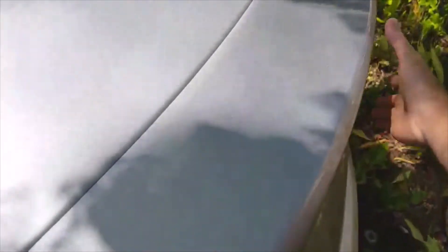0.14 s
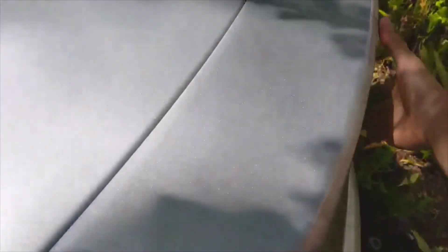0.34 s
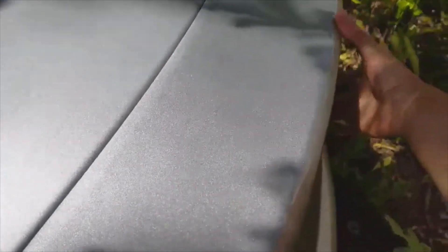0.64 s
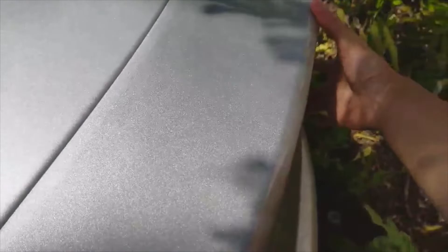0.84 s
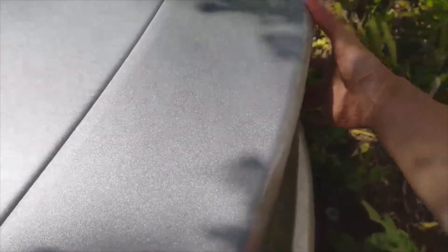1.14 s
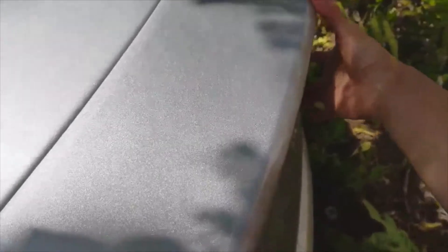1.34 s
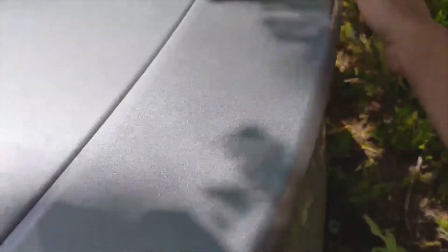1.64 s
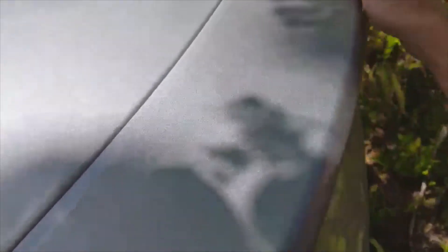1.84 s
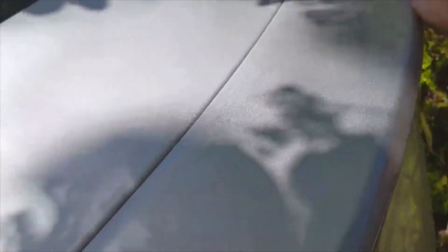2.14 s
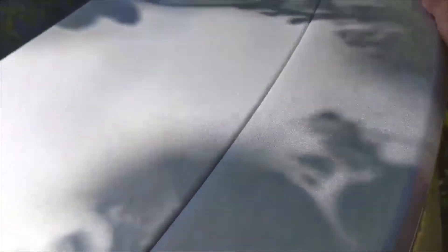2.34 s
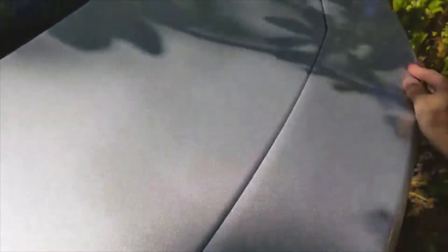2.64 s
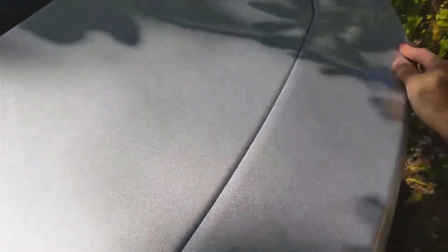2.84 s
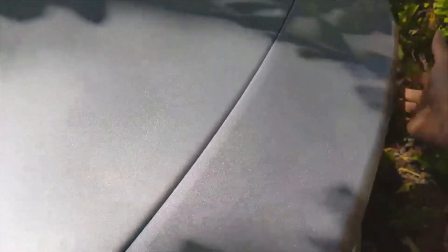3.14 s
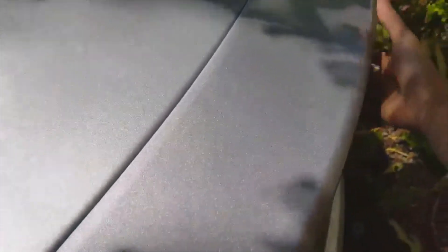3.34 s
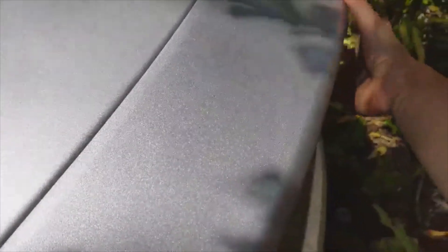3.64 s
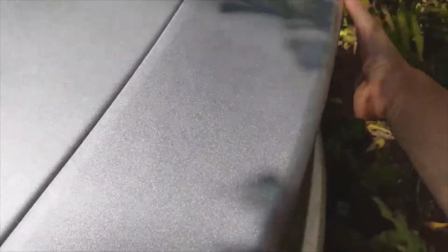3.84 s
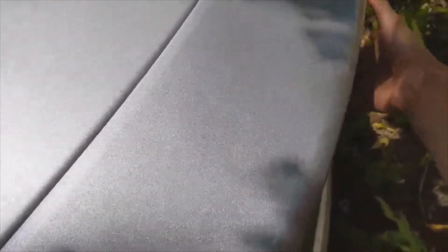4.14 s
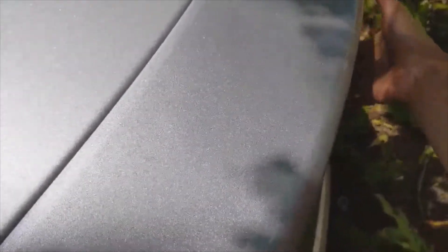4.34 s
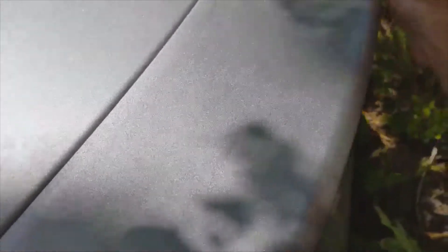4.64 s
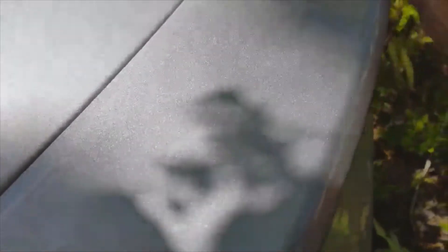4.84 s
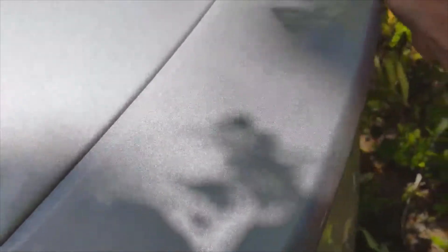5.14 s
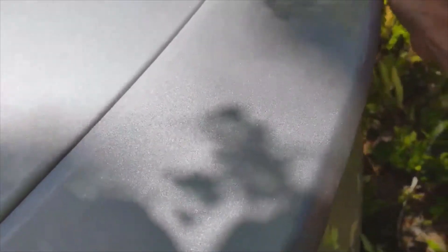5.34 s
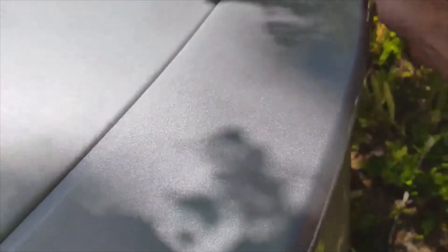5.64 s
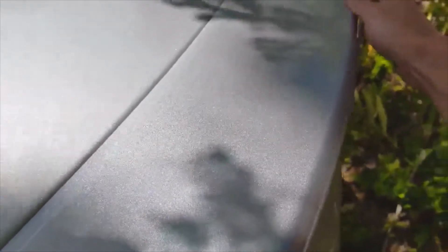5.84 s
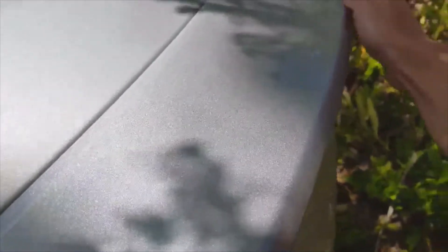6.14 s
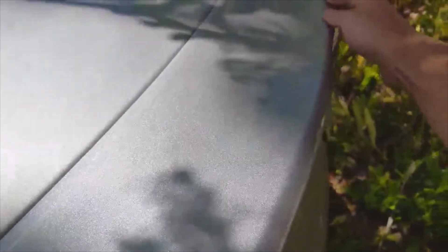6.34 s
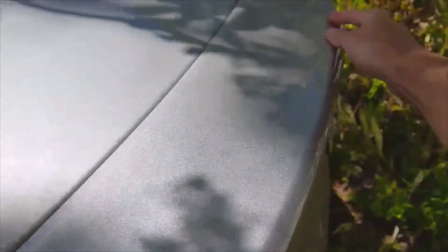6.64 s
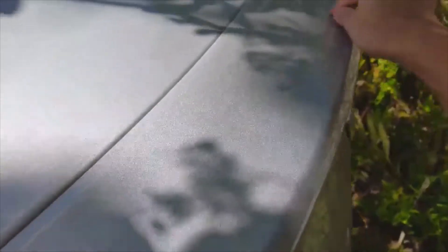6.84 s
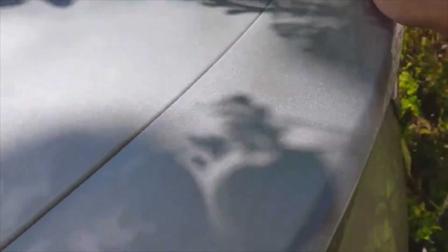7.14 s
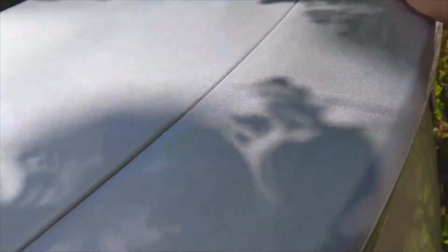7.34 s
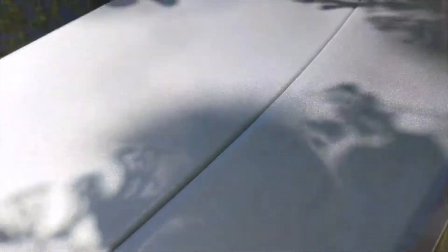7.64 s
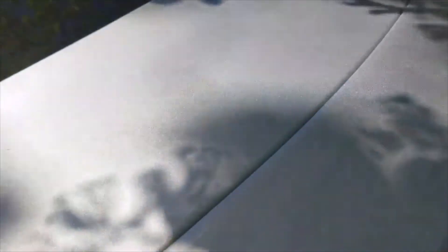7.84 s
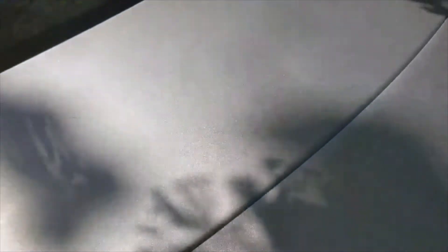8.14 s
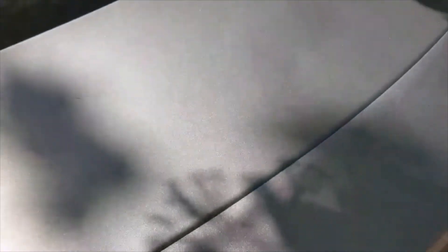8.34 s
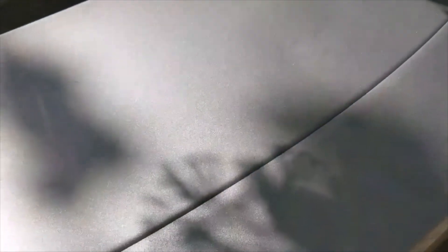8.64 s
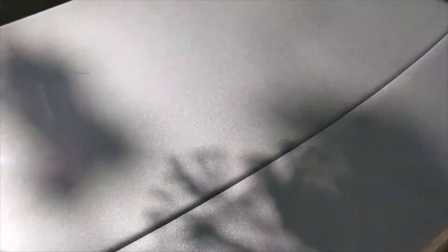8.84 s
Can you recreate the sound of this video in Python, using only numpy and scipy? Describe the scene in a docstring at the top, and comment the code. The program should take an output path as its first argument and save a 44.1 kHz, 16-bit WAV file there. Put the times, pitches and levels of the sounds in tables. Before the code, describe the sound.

Two close car door slams, each after a quieter clunk of the handle, over faint leaves and a distant bird.

```python
"""A car door is pulled open and swung shut twice, close by, in a leafy yard.
Opening, the handle clunks and the latch springs free; shutting, the latch ticks, the door hits its
seal, the sheet metal rings and the cabin air booms. Each hit is a noise rattle plus ringing modes.
Around it are small grainy rubs and ticks of a nearby hand, the sine whistles of a far bird,
and a soft murmur of leaves and distant traffic."""
import sys
import numpy as np
from scipy import signal
from scipy.io import wavfile
from scipy.ndimage import uniform_filter1d

SR = 44100
rng = np.random.default_rng(int(sys.argv[2]) if len(sys.argv) > 2 else 0)


def bounce(signal):
    """Save signal as a 16-bit WAV file at the path given by the first command-line argument."""
    frames = np.transpose(np.atleast_2d(signal))
    limited = np.clip(frames, -1, 1)
    pcm = np.round(limited * 32767).astype(np.int16)
    wavfile.write(sys.argv[1], SR, pcm)


N = 397341
T = np.arange(N) / SR

# Pulls of the handle, timed where the lock hits its stop: time_s, level_db
OPENINGS = [(1.239, -25), (4.169, -25)]
# Shutting swings, timed where the door meets its frame: time_s, speed_m_per_s
SHUTS = [(2.613, 1.0), (8.2835, .745)]
# Stereo image of the outdoor murmur and the rubs: frequency_hz, correlation
AIR_CORRELATION = [(60, 0.75), (250, 0.72), (600, 0.17), (1200, 0), (4000, 0.043), (12000, 0.05)]


def door():
    """The whole door: handle, latch and slam over soft low bumps and the cabin's boom."""
    # Stereo image of the rattle: frequency_hz, correlation
    correlation = [(100, 0.89), (280, 1), (600, 0.95), (1200, 0.11), (4000, 0.29), (12000, -0.46)]
    bands = []
    for band in noise_bands(thirds(100), correlation):
        power = uniform_filter1d(np.mean(band ** 2, axis=0), int(.02 * SR))
        bands.append(band / np.sqrt(power + 1e-9))   # steady noise, so the hits alone shape it
    lock = pan(handle(bands) + latch(bands), left_db=-.2)
    body = pan(slam(bands), left_db=-1.5) + low_bumps()
    return lock + body + pan(cabin_boom(leak_hz=24.2, ring_db=4), left_db=1.5)


def handle(bands):
    """Handle and lock clunk on each pull, and again as the shut door rebounds from its seal."""
    # Slack taken up, lock caught, stop hit: delay_s, level_db, tilt_db_per_octave, build_s, ring_factor
    pull = [(-.062, -22.5, 3.6, .008, 4.2), (-.0215, -11.7, 2.8, .0018, 1.1), (0, -.3, 0, .002, .8)]
    # Rebound on the lock: delay_s (at 1 m/s), level_db, tilt_db_per_octave, build_s, ring_factor
    rebound = [(.0195, -25, -2.5, .003, 1.25)]
    # Colour of the lock's rattle: frequency_hz, density_db
    colour = [(65, -34), (110, 2.5), (455, -5.5), (547, 2), (792, -13.5), (1010, -10.5), (1630, -16),
              (2360, -19.5), (10800, -50.5), (13800, -49), (15000, -78)]
    # Modes of the handle and the skin around it: pitch_hz, level_db, t60_s
    modes = [(155, 2, 0.098), (274, -5.5, 0.17), (330, -5, .1), (398, -16, .08), (535, 1, .08),
             (600, -7.5, 0.18), (1015, 1, 0.065), (1286, -10, 0.059), (1420, -8.5, .07), (2040, -18, 0.097)]
    hits = on_opening(pull)
    hits += [(s + delay * speed, *touch) for s, speed in SHUTS for delay, *touch in rebound]
    clatter = rattle(hits, colour, bands, crack_db=.5, crack_s=.0076,
                     tail_db=-38, tail_t60=.6, lag_cycles=.42, low_cut_hz=260)
    return clatter + struck(hits, modes, level_db=4, swell_cycles=3.15, scatter_db=1.2)


def latch(bands):
    """The latch springs free on opening and ticks on shutting; soft door knocks ring the same modes."""
    # The latch drags, then lets go: delay_s, level_db, tilt_db_per_octave, build_s, ring_factor
    release = [(.0445, -18, 2, .021, .8), (.065, -1.2, .3, .0036, .9)]
    # Tick on the striker: gap_m, level_db, tilt_db_per_octave, build_s, ring_factor
    striker = [(.0293, -33, 1.6, .0005, 1.0)]
    # A hand takes hold, then the hinge stay knocks: time_s, level_db, tilt_db_per_octave, build_s
    soft_knocks = [(.333, -52, -5, .004), (1.595, -46, -1, .023), (4.503, -46, -.5, .007),
                   (4.587, -47.5, 1, .001), (5.675, -49, -1, .03), (6.7, -49, -2, .03),
                   (7.873, -41.5, -2, .0034), (7.925, -44.5, -4, .017)]
    # Colour of the latch's rattle: frequency_hz, density_db
    colour = [(65, -45), (110, 1), (245, -2.5), (645, -18), (953, -8), (1300, -14), (2610, -21.5),
              (3560, -28), (12000, -44), (14100, -47), (15000, -82)]
    # Modes of the latch and the freed door: pitch_hz, level_db, t60_s
    modes = [(191, 1, 0.107), (246, 6, 0.13), (269, -1, 0.27), (306.4, -2.5, 0.3), (380, -4.5, 0.19),
             (409, -11, 0.12), (592, -3.5, 0.11), (770, -22, 0.16), (960, -13.5, 0.16), (1064, -21, .11),
             (1780, -17, 0.18), (2370, -5, .08), (2540, -7, 0.063), (5790, -15, 0.06)]
    knock_ring_factor = 1.4
    hits = on_opening(release) + on_shutting(striker)
    hits += [(*knock, knock_ring_factor) for knock in soft_knocks]
    clatter = rattle(hits, colour, bands, crack_db=5.5, crack_s=.0061,
                     tail_db=-38, tail_t60=.6, lag_cycles=.54, low_cut_hz=200)
    return clatter + struck(hits, modes, level_db=-1, swell_cycles=1.7, scatter_db=.1)


def slam(bands):
    """The door lands and its sheet metal rings."""
    # Hits on the seal, then the frame: gap_m, level_db, tilt_db_per_octave, build_s, ring_factor
    seating = [(.006, -18, .6, .002, .6), (0, -14.7, 1.3, .0007, .76)]
    # Colour of the slam's rattle: frequency_hz, density_db
    colour = [(53, -31), (90, 7.5), (144, 0), (231, -6), (318, -10), (354, -6.5), (543, -10), (592, -6),
              (765, -17), (1390, -17), (1840, -25.5), (3280, -27.5), (12100, -49.5), (14100, -47),
              (15000, -66)]
    # Sheet-metal modes of the shut door: pitch_hz, level_db, t60_s
    modes = [(98.2, -5, 0.35), (116.8, -2.5, .32), (134.3, -1, .28), (152.6, -2.5, 0.28), (196, 4, 0.042),
             (262, -8, .3), (316, -4, 0.27), (383, -15, .2), (436, -1, 0.22), (496, -2, 0.2),
             (580, 1, 0.18), (667, -17, 0.17), (757, -3, 0.17), (895, 3.5, 0.11), (1026, -7.5, .12),
             (1219, -1, 0.1), (1396, 1, 0.11), (1580, -6, 0.086), (2124, -8.5, 0.1), (3315, -23, 0.082)]
    hits = on_shutting(seating)
    clatter = rattle(hits, colour, bands, crack_db=6.5, crack_s=.0037,
                     tail_db=-25, tail_t60=.65, lag_cycles=.33, low_cut_hz=116)
    return clatter + struck(hits, modes, level_db=-6.5, swell_cycles=1.15, scatter_db=.8)


def cabin_boom(leak_hz, ring_db):
    """Opening or shutting, the door pushes a pulse of air that leaks away and leaves the cabin ringing."""
    # Modes of the cabin air and the body on its springs: pitch_hz, level_db, t60_s
    modes = [(22.6, -13, 0.34), (32, -19, 0.45), (39.7, -16, 0.34), (65, -22, .36), (101, -20, .26)]
    unseal_lead_s, unseal_db, unseal_width_s = .0068, -1.2, .0023
    shut_db, shut_width_s = -4.8, .0033   # at 1 m/s; a slower door pushes softer and longer
    pulses = [(s - unseal_lead_s, db + unseal_db, unseal_width_s) for s, db in OPENINGS]
    pulses += [(s, shut_db + speed_db(speed), shut_width_s / speed) for s, speed in SHUTS]
    push = sum(from_db(db) * np.exp(-((T - s) / width) ** 2 / 2) for s, db, width in pulses)
    flow = np.gradient(push)
    boom = sum(from_db(db + ring_db) * ring(flow, hz, t60) for hz, db, t60 in modes)
    return butter(push, leak_hz, "high", order=3) + boom


def low_bumps():
    """Soft swells of low rumble."""
    # Bumps: time_s, level_db, half_length_s
    bumps = [(.3, -51, 0.082), (2.853, -46, 0.031), (3.214, -51, 0.047), (4.975, -44.5, 0.057),
             (7.914, -43, 0.051)]
    swells = sum(from_db(db) * np.exp(-((T - s) / half) ** 2) for s, db, half in bumps)
    return swells * rms_one(butter(rng.standard_normal(N), [25, 95], "band"))


def on_opening(steps):
    """The same run of hits goes with each pull of the handle."""
    return [(s + delay, pull_db + db, *touch) for s, pull_db in OPENINGS for delay, db, *touch in steps]


def on_shutting(steps):
    """The closing door hits each part when that part's gap is left to travel."""
    return [(s - gap / speed, db + speed_db(speed), *touch)
            for s, speed in SHUTS for gap, db, *touch in steps]


def speed_db(speed):
    """A faster door hits harder: 10 dB for each doubling of speed."""
    return 10 * np.log2(speed)


def rattle(hits, colour, bands, crack_db, crack_s, tail_db, tail_t60, lag_cycles, low_cut_hz):
    """Countless close modes of door and lock: a crack, a decay by band, a faint return from the trees."""
    # Decay of the rattle: frequency_hz, t60_s
    decay = [(100, 0.36), (300, 0.3), (600, 0.19), (1200, 0.18), (4000, 0.18), (12000, 0.21)]
    centres = thirds(100)[:, None]
    t60s = at_hz(decay, centres)
    share = from_db(at_hz(colour, centres)) ** 2 * centres / t60s
    power = np.zeros((len(centres), N))
    for s, db, tilt_db, build_s, ring_factor in hits:
        span = slice(int((s - .09) * SR), int((s + .45) * SR))
        t = T[span] - s - lag_cycles / centres   # long bending waves arrive later
        after = np.maximum(t, 0)
        rise = np.exp(2 * np.minimum(t, 0) / (build_s + 1 / (2 * centres)))
        fall = np.exp(-2 * np.log(1000) * after / (t60s * ring_factor))
        crack = from_db(crack_db) ** 2 * centres / (centres + 1500) * np.exp(-2 * after / crack_s)
        tail = from_db(tail_db) ** 2 * np.exp(-2 * np.log(1000) * after / tail_t60)
        tilted = share * from_db(tilt_db * np.log2(centres)) ** 2
        power[:, span] += from_db(db) ** 2 * tilted / tilted.sum() * rise * (fall + crack + tail)
    clatter = sum(np.sqrt(p) * band for p, band in zip(power, bands))
    return butter(clatter, low_cut_hz, "high", order=1)   # leave the bass to a few modes


def struck(hits, modes, level_db, swell_cycles, scatter_db):
    """Every hit sets the modes ringing; they swell over a few cycles, and high ones spread wide."""
    hz, mode_db, t60 = np.array(modes).T[:, :, None]
    t = T[:SR // 2]
    swell = 1 - np.exp(-(t * hz / swell_cycles) ** 2)
    left_lead = np.clip(hz / 900, 0, 1) * np.pi / 4 * (-1) ** np.arange(len(hz))[:, None]
    tones = np.array([np.sin(2 * np.pi * hz * t + side * left_lead) for side in (1, -1)])
    rings = tones * swell * np.exp(-np.log(1000) * t / t60)
    out = np.zeros((2, N))
    for s, db, tilt_db, _, _ in hits:
        scatter = scatter_db * rng.standard_normal(hz.shape)
        strength = from_db(db + level_db + mode_db + tilt_db * np.log2(hz / 600) + scatter)
        start = int(s * SR)
        out[:, start:start + len(t)] += (strength * rings).sum(axis=1)
    return out


def hand():
    """A finger rubs to and fro: light strokes out and, mid-run, firm strokes back that end in a snap."""
    # Single dry rubs: end_s, length_s, level_db
    lone = [(.855, .16, -59), (1.55, .093, -60), (2.053, .14, -56.5), (3.04, .035, -52), (4.85, .16, -62),
            (5.405, .04, -55.5), (7.85, .3, -61), (8.24, .07, -57)]
    period_s, snap_delay_s, snap_db = .3545, .0105, -37.5
    light = [(5.286 + k * period_s, .072, -57.5) for k in range(6)]   # same columns
    firm = [(5.783 + k * period_s, .029, -48) for k in range(3)]
    snaps = [(end + snap_delay_s, snap_db) for end, _, _ in firm]
    return rubs(lone + light + firm, grain_db=3.2) + grip_ticks(snaps, decay_s=.0019, trim_db=-.3)


def rubs(strokes, grain_db):
    """Each rub is a grainy hiss that swells and stops."""
    # Colour of the rasp: frequency_hz, density_db
    colour = [(1200, 6), (3000, -1), (4400, 13), (6000, -2), (8000, 8), (10000, -17), (12500, 1),
              (15000, -45)]
    hiss = coloured_noise(thirds(1250), colour, AIR_CORRELATION, patchy_db=1)
    envelope = np.zeros(N)
    for end, length, db in strokes:
        corners_s = [end - 1.6 * length, end - length / 2, end - length / 10, end + .015]
        envelope += from_db(db) * np.interp(T, corners_s, [0, 1, 1, 0])
    roughness = rms_one(butter(rng.standard_normal(N), 250, "low"))
    return hiss * envelope * rms_one(from_db(grain_db * roughness))


def grip_ticks(snaps, decay_s, trim_db):
    """Ticks of the grip and snaps of the finger: tiny bursts of bright noise."""
    # Ticks of the grip: time_s, level_db
    ticks = [(7.1392, -46), (7.4914, -36), (7.5557, -40), (7.6181, -41), (7.6984, -41), (7.7473, -41),
             (7.8416, -40), (7.9872, -39), (8.0661, -44), (8.1653, -46)]
    clicks = np.zeros(N)
    for s, db in ticks + snaps:
        clicks[int(s * SR)] = from_db(db + trim_db)
    envelope = signal.lfilter([1], [1, -np.exp(-1 / (decay_s * SR))], clicks + 1e-18)
    return envelope * bright_hiss(low_hz=3500, high_hz=6200)


def bird(half_note_s, waver):
    """Far whistles that arch up to their top pitch and droop, blurred by the leaves."""
    # Single calls: time_s, top_pitch_hz, level_db
    calls = [(.418, 3680, -57), (3.93, 1940, -61), (5.57, 1910, -53)]
    slide, droop = .1, .035   # shares of the pitch
    out = np.zeros((2, N))
    for s, hz, db in song(count=8) + calls:
        span = slice(int((s - .1) * SR), int((s + .1) * SR))
        t = (T[span] - s) / half_note_s
        blur = rms_one(butter(rng.standard_normal((2, len(t))), 177, "low"))
        pitch = hz * (1 - slide * np.minimum(t, 0) ** 2 - droop * np.maximum(t, 0) ** 2 + waver * blur)
        out[:, span] += from_db(db) * np.exp(-t ** 2) * np.sin(2 * np.pi * np.cumsum(pitch, axis=1) / SR)
    return out


def song(count):
    """The bird's run of notes slows, sinks in pitch and is loudest in the middle."""
    note = np.arange(count)
    time_s = 3.86 + .221 * note + .0022 * note ** 2
    pitch_hz = 3330 - 42 * note + 60 * rng.standard_normal(count)
    level_db = -55.5 - 3.5 * np.linspace(-1, 1, count) ** 2
    return list(zip(time_s, pitch_hz, level_db))


def outdoors(murmur_db, drone_hz, drone_db):
    """A softly wavering murmur of leaves and distant traffic, with a faint low drone."""
    # Colour of the murmur: frequency_hz, density_db
    colour = [(12, -33), (20, -1.5), (147, -16.5), (223, 1), (263, -13.5), (347, -4.5), (387, -9.5),
              (457, -6.5), (497, -9.5), (1460, -21), (4200, -26.5), (6180, -30), (7720, -32.5),
              (13800, -38), (15000, -49)]
    murmur = coloured_noise(thirds(20.49), colour, AIR_CORRELATION, patchy_db=1.02)
    drone = rms_one(ring(rng.standard_normal(N), drone_hz, t60=.075))
    return from_db(murmur_db) * murmur + from_db(drone_db) * drone


def opening_hiss():
    """A thin bright hiss that fades over the first seconds."""
    # Fade of the hiss: time_s, level_db
    fade = [(0, -65), (2.4, -72), (3.6, -78), (9, -76)]
    time_s, level_db = np.transpose(fade)
    return from_db(np.interp(T, time_s, level_db)) * bright_hiss(low_hz=3500, high_hz=6000)


def bright_hiss(low_hz, high_hz):
    """Wide stereo hiss with a gently rolled-off top; rms one."""
    hiss = butter(rng.standard_normal((2, N)), low_hz, "high")
    return rms_one(butter(hiss, high_hz, "low", order=1))


def coloured_noise(centres, colour, correlation, patchy_db):
    """Stereo noise with a given spectrum, each band wavering on its own; rms one."""
    bands = noise_bands(centres, correlation)
    return rms_one(sum(from_db(at_hz(colour, hz) + patchy_db * drift(10)) * np.sqrt(hz) * band
                       for hz, band in zip(centres, bands)))


def noise_bands(centres, correlation):
    """One stereo noise of rms one for each third-octave band; neighbours are unrelated."""
    white = rng.standard_normal((2, 2, N))
    for k, hz in enumerate(centres):
        mid, side = butter(white[k % 2], [hz / 2 ** (1 / 6), hz * 2 ** (1 / 6)], "band")
        alike = np.clip(at_hz(correlation, hz), -1, 1)
        yield rms_one(np.sqrt(1 + alike) * mid + np.sqrt(1 - alike) * side * [[1], [-1]])


def drift(rate_hz):
    """A slow random wander around zero."""
    knots = rng.standard_normal(int(N / SR * rate_hz) + 2)
    return np.interp(T * rate_hz, np.arange(len(knots)), knots)


def ring(force, hz, t60):
    """Resonator: a unit click sets a sine of height one ringing."""
    radius, step = np.exp(-np.log(1000) / (t60 * SR)), 2 * np.pi * hz / SR
    return signal.lfilter([0, np.sin(step)], [1, -2 * radius * np.cos(step), radius ** 2], force + 1e-18)


def butter(x, hz, kind, order=2):
    """Causal Butterworth filter."""
    sections = signal.butter(order, np.clip(hz, 5, .48 * SR), kind, fs=SR, output="sos")
    return signal.sosfilt(sections, x + 1e-18)


def thirds(low_hz):
    """Centres of third-octave bands up to the top of hearing."""
    return low_hz * 2 ** np.arange(0, np.log2(16000 / low_hz), 1 / 3)


def at_hz(points, hz):
    """Read a table on a log-frequency axis."""
    points = np.array(points)
    return np.interp(np.log(hz), np.log(points[:, 0]), points[:, 1])


def pan(x, left_db):
    """Set the left side left_db above the right."""
    return x * from_db(left_db / 2 * np.array([[1], [-1]]))


def from_db(db):
    """Decibels to gain."""
    return 10 ** (np.asarray(db) / 20)


def rms_one(x):
    """Scale to an rms of one."""
    return x / np.sqrt(np.mean(x ** 2) + 1e-20)


def scene():
    """The door in front, the yard around it."""
    background = outdoors(murmur_db=-49.5, drone_hz=229.5, drone_db=-57.5) + opening_hiss()
    background += bird(half_note_s=.028, waver=.022)
    return door() + hand() + background


def record(dry):
    """The highest peaks are rounded off, and the top is cut steeply."""
    ceiling, cutoff_hz = .85, 14400
    rounded = dry / (1 + (dry / ceiling) ** 4) ** (1 / 4)
    return signal.sosfilt(signal.ellip(10, .2, 70, cutoff_hz, fs=SR, output="sos"), rounded)


dry = scene()
out = record(dry)
bounce(out)
```